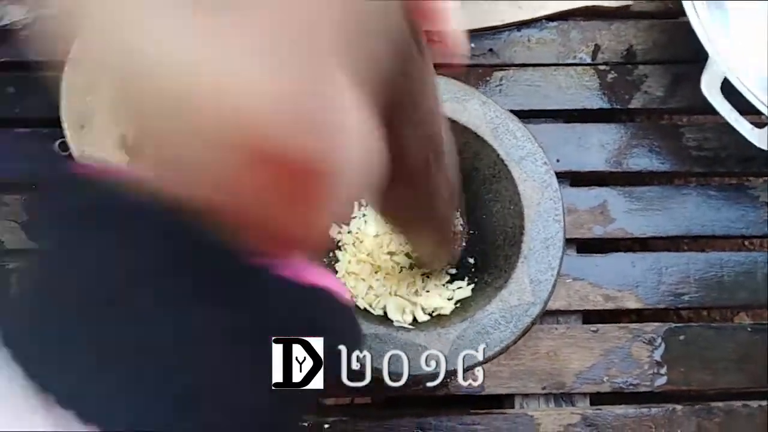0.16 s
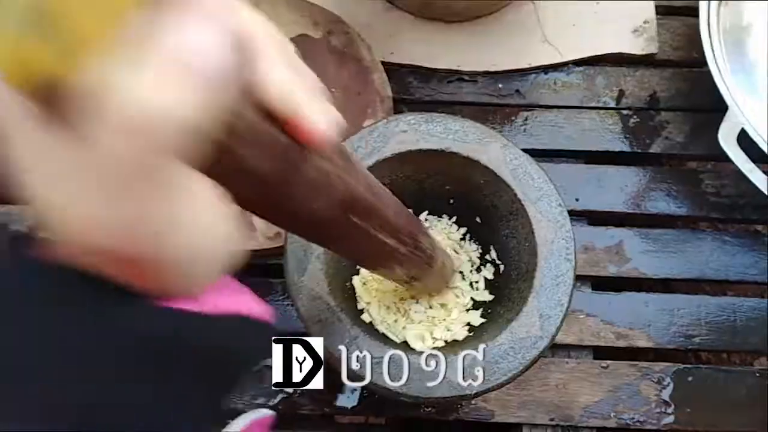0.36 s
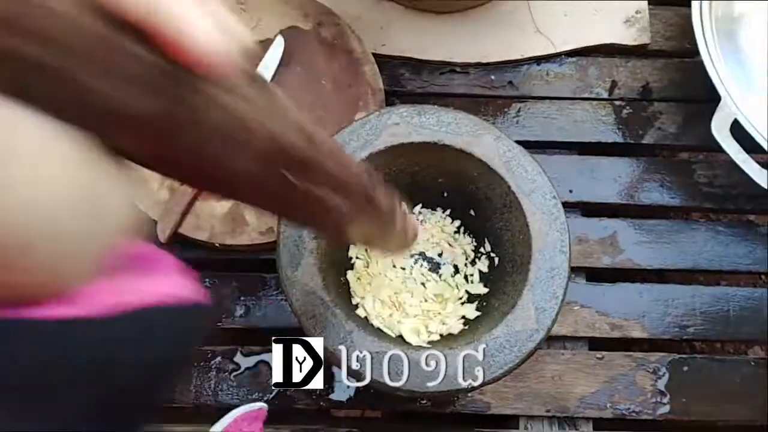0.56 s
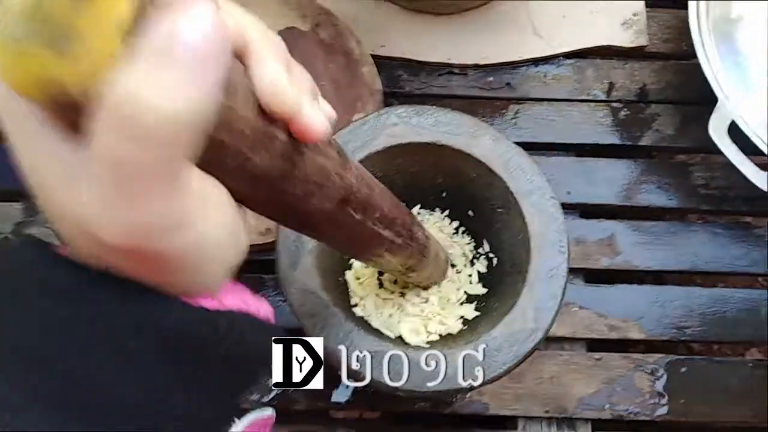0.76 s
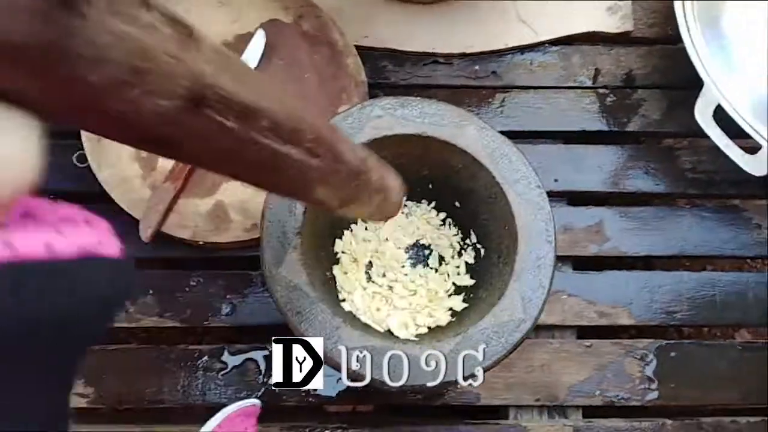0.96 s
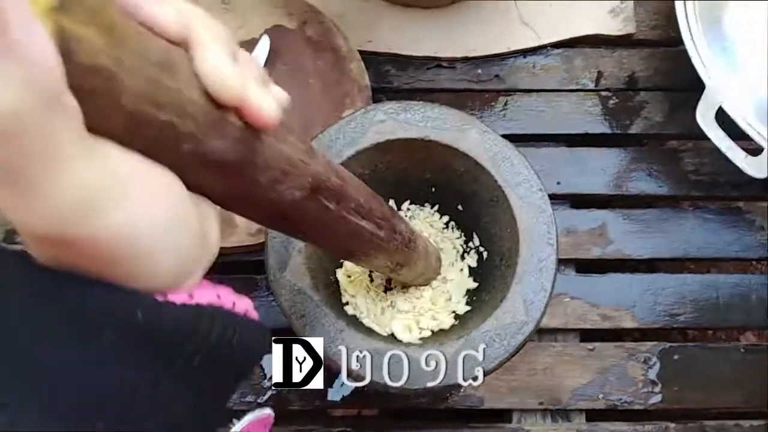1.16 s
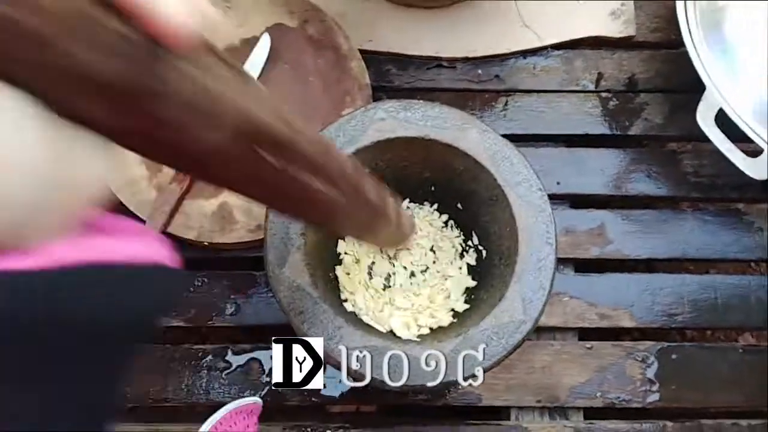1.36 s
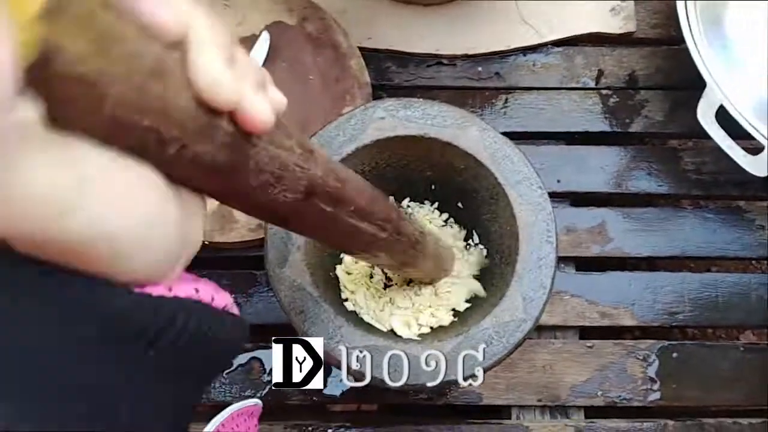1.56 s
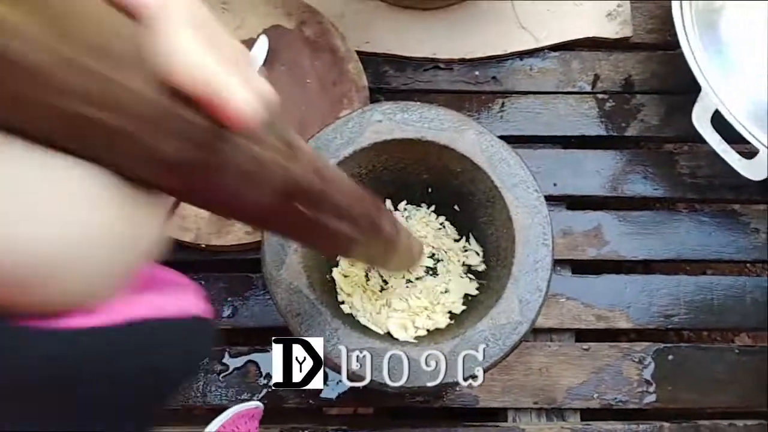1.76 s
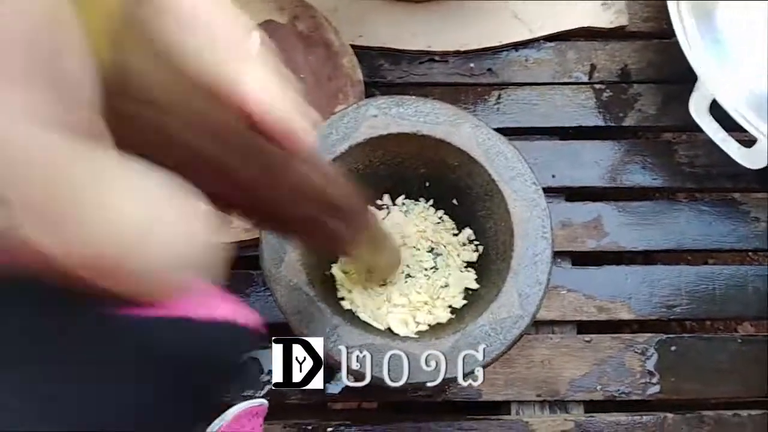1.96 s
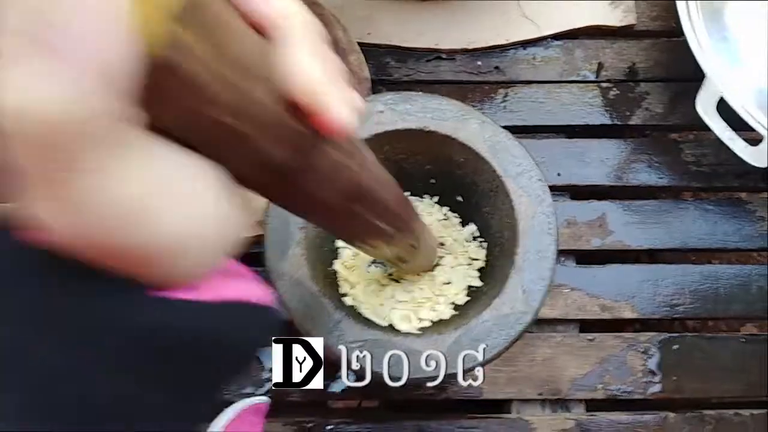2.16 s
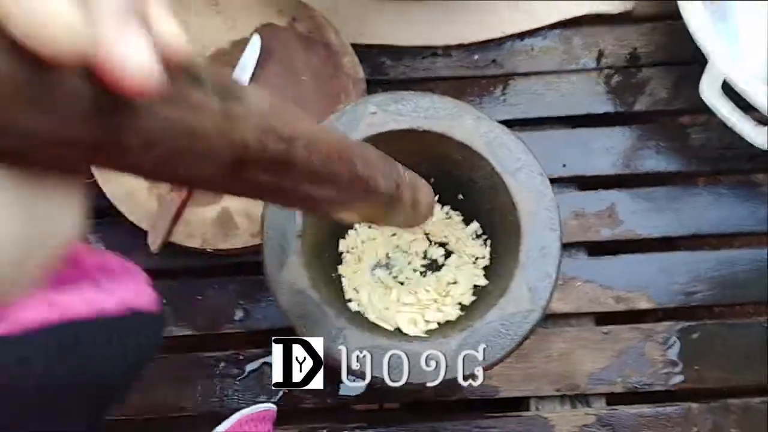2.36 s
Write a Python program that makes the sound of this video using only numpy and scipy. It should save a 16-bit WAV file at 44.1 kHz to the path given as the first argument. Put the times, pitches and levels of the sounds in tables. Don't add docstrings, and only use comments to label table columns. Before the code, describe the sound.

Close, loud pounding in a stone mortar: a hard ringing knock, then softer, medium, muffled and hard damped ones, with snapping fibres and short scrapes between, under an outdoor roof with faint bird calls and traffic hum.

```python
import sys
import numpy as np
from scipy import signal
from scipy.io import wavfile

SR = 44100
rng = np.random.default_rng(int(sys.argv[2]) if len(sys.argv) > 2 else 0)


def materialize(psi):
    bounded = np.clip(np.atleast_2d(psi).T, -1, 1)
    quanta = np.round(bounded * 32767).astype(np.int16)
    wavfile.write(sys.argv[1], SR, quanta)


def invert_db(x):
    u = np.asarray(x, float) / 20
    return 10 ** u


N = 105840
TIME_S = np.arange(N) / SR
OPPOSITE = np.array([[1], [-1]])


def rms_one(x):
    return x / np.sqrt(np.mean(x ** 2) + 1e-20)


def over_time(points):
    return np.interp(TIME_S, *np.transpose(points))


def at_hz(points, hz):
    table_hz, values = np.transpose(points)
    return np.interp(np.log(hz), np.log(table_hz), values)


def lowpass(x, order, hz):
    return signal.sosfilt(signal.butter(order, hz, fs=SR, output="sos"), x)


def highpass(x, order, hz):
    return signal.sosfilt(signal.butter(order, hz, "high", fs=SR, output="sos"), x)


def bandpass(x, order, low_hz, high_hz):
    return signal.sosfilt(signal.butter(order, [low_hz, high_hz], "band", fs=SR, output="sos"), x)


def drift(rate):
    r = np.exp(-80 * np.pi * rate / SR)
    noise = rng.standard_normal(N // 40 + 2002)
    slow = signal.lfilter([1], [1, -2 * r, r * r], noise)[2000:]
    return np.interp(np.arange(N) / 40, np.arange(len(slow)), rms_one(slow))


def ring(x, hz, t60):
    r = invert_db(-60 / (t60 * SR))
    w = 2 * np.pi * hz / SR
    return signal.lfilter([0, np.sin(w)], [1, -2 * r * np.cos(w), r * r], x + 1e-18)


def peak(x, hz, width_hz):
    r = np.exp(-np.pi * width_hz / SR)
    w = 2 * np.pi * hz / SR
    return signal.lfilter(np.array([1, 0, -1]) * (1 - r * r) / 2, [1, -2 * r * np.cos(w), r * r], x)


def double_peak(x, hz, width_hz):
    return peak(peak(x, hz, width_hz), hz, width_hz)


def dying(s, db, t60, attack_s):
    t = np.maximum(TIME_S - s, 0)
    return invert_db(db - 60 * t / t60) * (1 - np.exp(-t / attack_s))


def bands(x):
    edges = 25 * 2 ** np.arange(0, 9.4, .4)
    for k, (low, high) in enumerate(zip(edges, edges[1:])):
        yield np.sqrt(low * high), bandpass(x[k % 2], 3, low, high)


def scatter(x, t60, db, cut_hz):
    t = np.arange(SR // 2) / SR
    echo = rng.standard_normal((2, len(t))) * invert_db(-60 * t / t60) * (1 - np.exp(-t / .003))
    echo = lowpass(echo, 1, cut_hz)
    echo *= invert_db(db) / np.sqrt(np.sum(echo ** 2, axis=1, keepdims=True))
    return signal.fftconvolve(x[None], echo, axes=1)[:, :N]


# f/Hz, likeness [0-1]
LIKENESS = [(40, 0.094), (100, 0.9), (500, 0.64), (2000, 0.068), (8000, 0.22)]


def diffuse_bands():
    for hz, (mid, side) in bands(rng.standard_normal((2, 2, N))):
        alike = np.clip(at_hz(LIKENESS, hz), 0, 1)
        yield hz, np.sqrt((1 + alike) / 2) * mid + np.sqrt((1 - alike) / 2) * side * OPPOSITE


# t/s, level/dB
HUM = [(0, -47.5), (.18, -56), (0.401, -48), (.65, -45.5), (.95, -48.5), (1.2, -46.5), (1.45, -47.5),
       (1.7, -43.5), (1.92, -50), (2.4, -46)]
# f/Hz, level/dB
HUM_COLOUR = [(25, -25.5), (70, -2.5), (130, -7), (420, -16.5), (740, -30.5), (1300, -26), (2000, -35.5),
              (3300, -41.5)]
# t/s, level/dB
TYRES = [(0, 2), (.12, -1), (.2, -3), (.6, -2.5), (1.0, 0.5), (1.5, -1.5), (1.9, -0.5), (2.2, 0.5),
         (2.4, 1)]


def traffic():
    hum, tyres_db = invert_db(over_time(HUM)), over_time(TYRES)
    power = sum(invert_db(2 * at_hz(HUM_COLOUR, hz)) for hz in np.arange(25, 3300, 5))
    colour_rms = np.sqrt(power * 10 / SR)
    out = 0
    for hz, noise in diffuse_bands():
        db = at_hz(HUM_COLOUR, hz) - 45 * max(np.log2(hz / 3300), 0)
        db = db + tyres_db * (hz > 550) + 2.0 * drift(5.3)
        out = out + hum * invert_db(db) / colour_rms * noise
    return out


# t/s, level/dB
ENGINE = [
    (0, -62.5),
    (.7, -55.5),
    (.82, -44.5),
    (1.12, -45),
    (1.25, -58),
    (1.9, -51.5),
    (2.4, -52),
]
# f/Hz, level/dB, share that follows the swell [0-1]
ENGINE_TONES = [(118.85, -1.5, 0.9), (148.3, 0.5, 0.6), (235.6, -12.5, .4), (353.4, -9, 0.4)]


def engine():
    swell_db = over_time(ENGINE)
    noise = rng.standard_normal(N + SR)
    out = np.zeros(N)
    for hz, db, share in ENGINE_TONES:
        tone = rms_one(double_peak(noise, hz, 5)[SR:])
        out += invert_db(db + share * swell_db + (1 - share) * swell_db.mean()) * tone
    return out


# t/s, level/dB
WASH = [
    (-.23, -28),
    (.21, -31),
    (0.648, -35.5),
    (1.111, -37),
    (1.55, -37),
    (1.978, -35),
]
# f/Hz, level/dB
WASH_COLOUR = [(100, -18), (400, 9), (1000, 4), (2000, -2), (4500, 0), (7500, -7), (11000, -31),
               (15000, -37)]
# f/Hz, t60/s
WASH_T60 = [(200, 0.82), (1000, 0.64), (3000, 0.54), (6000, 0.61), (12000, 0.51)]


def wash():
    out = 0
    for hz, noise in diffuse_bands():
        power = 0
        for s, db in WASH:
            decay = dying(s, db + at_hz(WASH_COLOUR, hz), at_hz(WASH_T60, hz), attack_s=0.033)
            power = power + decay ** 2 * invert_db(-2 * 40 * (TIME_S - s) ** 2)
        out = out + np.sqrt(power * invert_db(7.7 * drift(20))) * noise
    return out


def fibre_snaps(shape):
    size_db = 3.5 * np.minimum(rng.exponential(1, shape), 5)
    size = invert_db(size_db) * rng.choice([-1, 1], shape)
    return rms_one(size * (rng.random(shape) < 5200 / SR))


def to_ports(both, apart):
    return both + 1.075 * apart * OPPOSITE


# t/s, level/dB, t60/s
PEEL = [(0.075, -46.5, 0.076), (.345, -37, 0.083), (.405, -39, 0.092), (.728, -41, 0.08),
        (.745, -37, 0.085), (0.771, -31, 0.087), (1.196, -36.5, .1), (1.228, -40.5, 0.089),
        (1.267, -38, 0.084), (1.29, -44, 0.086), (1.335, -52, 0.088), (1.395, -51.5, 0.047),
        (1.423, -53.5, 0.083), (1.63, -44.5, 0.052), (1.653, -37, 0.078), (1.678, -30, .05),
        (1.697, -39, 0.088), (2.056, -38, 0.066), (2.084, -34.5, .07), (2.114, -40, 0.061)]
# f/Hz, width/Hz, level/dB
BOWL = [(3415, 370, 2), (4157, 69, 10.5), (4795, 200, 9.5), (6620, 330, 3.5), (7100, 440, 0.5),
        (10500, 2000, -20), (5600, 5000, -12)]


def peeling():
    peeled = fibre_snaps((2, N)) * sum(dying(*row, attack_s=.0008) for row in PEEL) + 1e-18
    hollow = 0
    for hz, width_hz, db in BOWL:
        hollow = hollow + invert_db(db) * peak(peak(peeled, hz, 2 * width_hz), hz, width_hz)
    return to_ports(*hollow)


CHIRPS = [0.16, 0.575, 0.88, 1.035, 1.325, 1.465, 1.772, 1.905, 2.215, 2.365]
# t/s, f/Hz, level/dB
FAR_CHIRPS = [
    (.98, 6500, -66.5),
    (1.04, 7260, -69.5),
    (1.464, 6740, -63),
    (2.24, 6850, -74.5),
]


def cricket():
    gate = 0.17
    for s in CHIRPS:
        chirp = np.sin(np.pi * np.clip((TIME_S - s) / 0.087, 0, 1))
        pulses = np.sin(np.pi * 27 * (TIME_S - s)) ** 2
        gate = gate + chirp * (0.24 + pulses)
    noise = rng.standard_normal(N)
    far = np.zeros(N)
    for s, hz, db in FAR_CHIRPS:
        chirp = np.sin(np.pi * np.clip((TIME_S - s) / 0.058, 0, 1))
        far += invert_db(db) * chirp * rms_one(peak(peak(noise, hz, 82), hz, 99))
    return invert_db(-65) * gate * rms_one(double_peak(noise, 6290, 110)) + far


# t/s, level/dB, t60/s
CRUNCH = [(.195, -58, .05), (0.2077, -2, 0.013), (.214, -28.5, 0.19), (.236, -27.5, 0.026),
          (.617, -70, 0.0088), (0.634, -37.5, 0.094), (0.639, -24, 0.061), (0.653, -29, 0.038),
          (0.67, -22.5, 0.03), (1.11, -8.5, 0.01), (1.116, -27, 0.089), (1.542, -25.5, 0.064),
          (1.553, -25.5, 0.078), (1.573, -36, 0.034), (1.9755, -5.5, 0.014), (1.984, -24.5, 0.069),
          (1.993, -25, 0.029)]
# f/Hz, level/dB
CRUNCH_COLOUR = [(500, -8), (1500, -5.5), (2600, -13), (3600, -1.5), (4800, 0), (6300, 6), (9000, -4.5),
                 (14000, -21)]


def crushing():
    crushed = fibre_snaps((2, 2, N)) * sum(dying(*row, attack_s=0.0014) for row in CRUNCH) + 1e-18
    coloured = 0
    for hz, part in bands(crushed):
        if hz > 300:
            coloured = coloured + invert_db(at_hz(CRUNCH_COLOUR, hz)) * part
    return to_ports(*coloured)


# t/s, level/dB, swell time/s
SHUDDERS = [
    (0.206, -21, 0.029),
    (.645, -27, 0.041),
    (1.111, -22, 0.013),
    (1.15, -33.5, 0.042),
    (1.545, -35, 0.041),
    (1.975, -26, 0.033),
]
BENCH_HZ = [110, 145, 191, 234, 285, 350, 400, 466]


def bench():
    shake = 0
    for s, db, swell_s in SHUDDERS:
        age = np.maximum(TIME_S - s, 0) / swell_s
        shake = shake + invert_db(db) * age * np.exp(1 - age)
    shape = (len(BENCH_HZ), N)
    bumps = rng.normal(0, 1, shape) * (rng.random(shape) < 550 / SR) * shake
    slats = 0
    for k, (bump, hz) in enumerate(zip(bumps, BENCH_HZ)):
        lean_db = [[3 * (-1) ** k], [0]]
        slats = slats + ring(bump, hz, 0.046) * invert_db(lean_db)
    return .15 * bandpass(slats, 2, 90, 600)


# t/s, level/dB, pestle f/Hz, share of the free ring time [0-1]
BLOWS = [
    (0.2078, -7.5, 1132, 0.78),
    (0.6408, -36.5, 1230, 0.1),
    (1.1105, -22, 1233, 0.43),
    (1.543, -34, 1230, 0.24),
    (1.9746, -11.5, 1211, 0.28),
]
# first touch level/dB, delay of the full blow/s
SKID = [
    (-7, 0.001164),
    (-2, 0.00192),
    (-6.5, .001),
    (-7, 0.00191),
    (-14.5, 0.00166),
]
# f/Hz, level/dB, t60/s
STONE = [(650, -15.5, 0.092), (767, -6.5, 0.029), (1445, -18, 0.093), (1620, -13.5, .11),
         (1745, -12.5, 0.092), (1960, -18.5, .07), (2507, -18.5, 0.16), (2587, -19, .27), (2563, -6, 0.017),
         (2697, -21, 0.22), (3020, -28, 0.17), (3200, -25.5, 0.31), (4170, -26.5, 0.056), (2200, -17, .06)]


def knocks():
    out = np.zeros(N)
    twins = 1 + 0.0252 * rng.uniform(-1.135, 1, (len(STONE), 3))
    chances = rng.normal(0, 0.3, (len(BLOWS), len(STONE)))
    for (s, db, hz, share), (touch_db, skid_s), chance in zip(BLOWS, SKID, chances):
        click = np.zeros(SR // 2)
        click[[0, int(skid_s * SR)]] = -invert_db([db + touch_db, db])
        click = lowpass(click, 1, 3780)
        pestle_t60 = 0.097 * share
        body = ring(click, hz, pestle_t60) + 0.19 * ring(click, hz * 1.02, 0.61 * pestle_t60)
        for (mode_hz, mode_db, t60), change_db, ratios in zip(STONE, chance, twins):
            neighbours = sum((-1) ** k * ring(click, mode_hz * q, t60 * share) for k, q in enumerate(ratios))
            cluster = ring(click, mode_hz, t60 * share) + invert_db(-4.5) * neighbours
            body += share ** 0.46 * invert_db(mode_db + change_db - 2.5) * cluster
        i = int(s * SR)
        out[i:i + len(body)] += body[:N - i]
    return out


def slats_and_pans(struck):
    free = np.interp(TIME_S, [row[0] + 0.1 for row in BLOWS], [row[3] for row in BLOWS])
    return scatter(struck * free, 0.18, -3.5, cut_hz=4900)


# t/s, level/dB
PINGS = [
    (0.633, -30),
    (.657, -21.5),
    (0.728, -38.5),
    (1.116, -21),
    (1.543, -19),
    (1.551, -19),
    (1.574, -28),
    (1.9761, -10.5),
    (1.99, -29),
]


def pings():
    rub = rng.standard_normal(N) * sum(dying(s, db, t60=0.012, attack_s=0.0017) for s, db in PINGS)
    return 0.13 * (ring(rub, 2640, 0.05) + 0.42 * ring(rub, 2640 * .97, 0.05))


# t/s, high note level/dB, low note level/dB, gap between notes/s, high note start f/Hz
CALLS = [
    (0.989, -54, -54, 0.041, 3120),
    (1.216, -56, -55, 0.07, 3328),
    (1.474, -55.5, -58, 0.04, 3420),
    (1.718, -52.5, -56.5, 0.032, 3133),
    (1.977, -59, -61, 0.0483, 3150),
    (2.301, -58.5, -57.5, 0.063, 3134),
    (2.28, -71, -74, .07, 3470),
]
FALLS = [.88, .93, 0.93, 0.92, 0.7, .85, .93]
BREATHS_DB = [0, -6, -3, -20, -20, -20, -20]
# start f/Hz, end f/Hz, length/s
LOW_NOTE = (2520, 2340, 0.1393)


def bird_note(start, db, hz0, hz1, length, air):
    u = np.clip((TIME_S - start) / length, 0, 1)
    glide_hz = hz1 + (hz0 - hz1) * (1 - u) ** 1.4
    return invert_db(db) * np.sin(np.pi * u ** 0.52) * (air + np.sin(2 * np.pi * np.cumsum(glide_hz) / SR))


def bird():
    out = np.zeros(N)
    breath = invert_db(-16.5) * rms_one(double_peak(rng.standard_normal(N), 3720, 900))
    for (s, high_db, low_db, gap_s, high_hz), fall, air_db in zip(CALLS, FALLS, BREATHS_DB):
        out += bird_note(s, high_db, high_hz, high_hz * fall, 1.7 * gap_s, invert_db(air_db) * breath)
        out += bird_note(s + gap_s, low_db, *LOW_NOTE, air=0)
    out *= 1 + 0.51 * drift(70.3) + .35 * drift(160)
    return out + scatter(out, 0.33, -2, cut_hz=15000)


# t/s, level/dB, dull mode f/Hz
TAP = (2.298, -35, 840)


def finger_tap():
    s, db, hz = TAP
    tap = np.zeros(N)
    tap[int(s * SR)] = invert_db(db)
    tap = lowpass(tap, 2, 2200)
    return ring(tap, hz, 0.012) + ring(tap, 513, 0.014) + 0.3 * ring(tap, 1150, 0.008)


def scene():
    struck = knocks()
    near = traffic() + engine() + wash() + peeling() + crushing() + bench()
    near = near + struck + slats_and_pans(struck) + pings() + bird() + finger_tap()
    lag_s = 0.000216
    near[0] = np.interp(np.arange(N) - lag_s * SR, np.arange(N), near[0])
    return near + cricket() * invert_db([[-20], [0]])


def top_cut(x):
    return signal.sosfilt(signal.butter(12, 15280, fs=SR, output="sos"), x)


def record(dry):
    dry = highpass(dry, 4, 54)
    dry = lowpass(dry, 14, 14200)
    left = invert_db(2) * (dry[0] + invert_db(15.5) * peak(dry[0], 2571, 527))
    left += invert_db(6.5) * highpass(left, 2, 9570)
    right = lowpass(dry[1], 1, 22000)
    return top_cut(np.clip([left, right], -.95, .95))


dry = scene()
out = record(dry)
materialize(out)
```